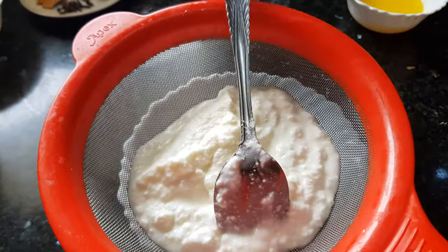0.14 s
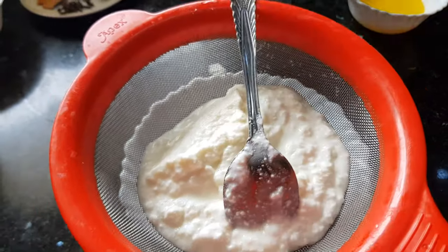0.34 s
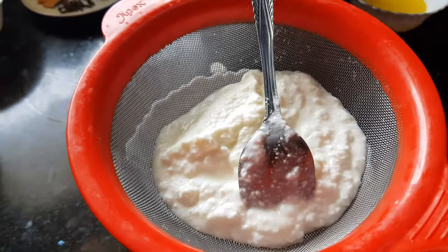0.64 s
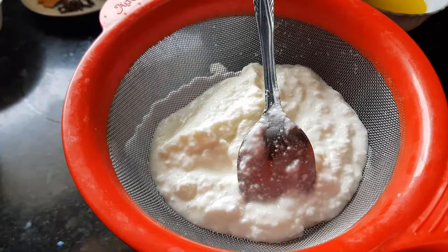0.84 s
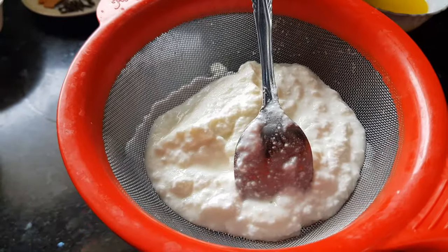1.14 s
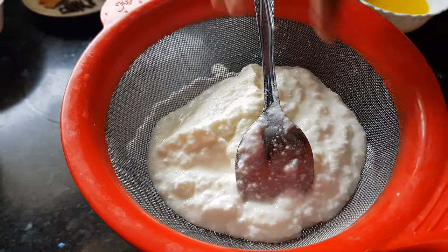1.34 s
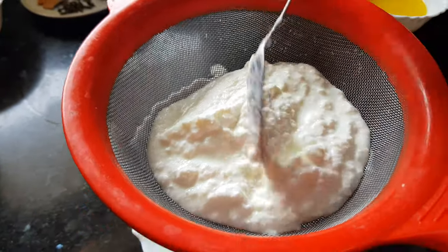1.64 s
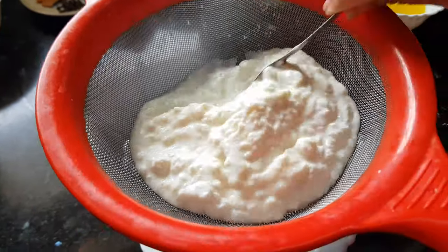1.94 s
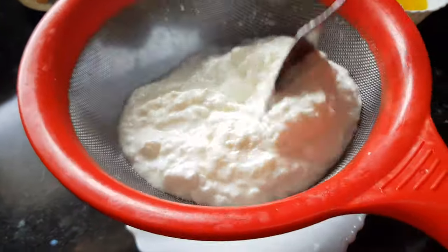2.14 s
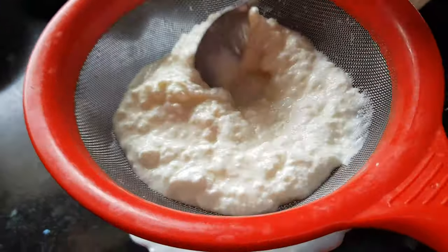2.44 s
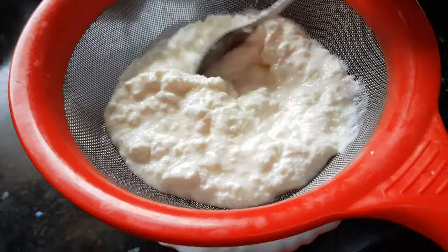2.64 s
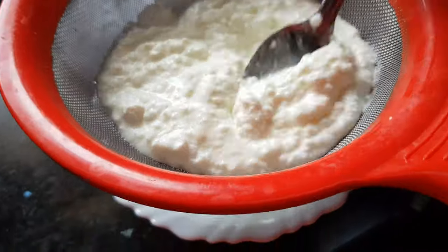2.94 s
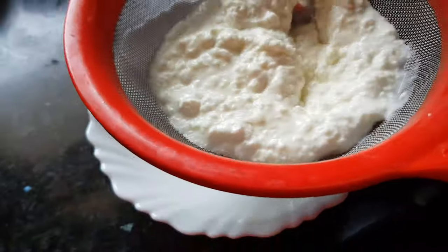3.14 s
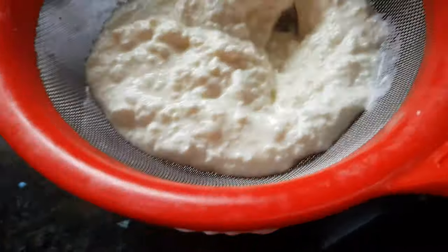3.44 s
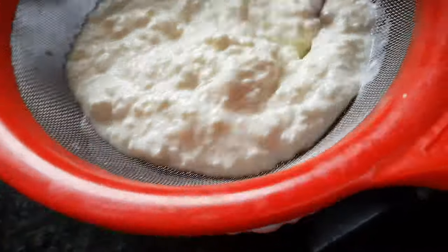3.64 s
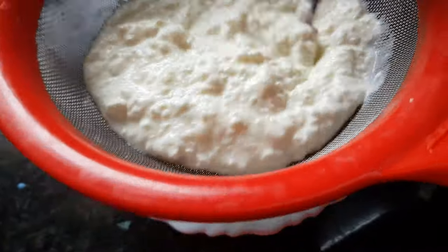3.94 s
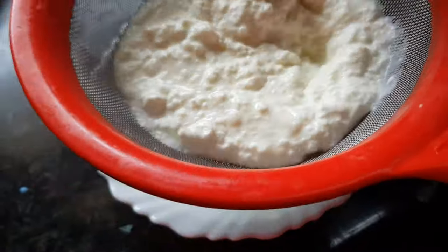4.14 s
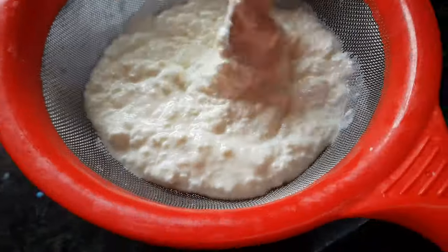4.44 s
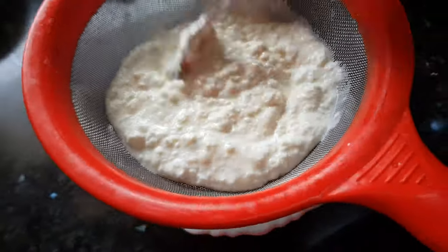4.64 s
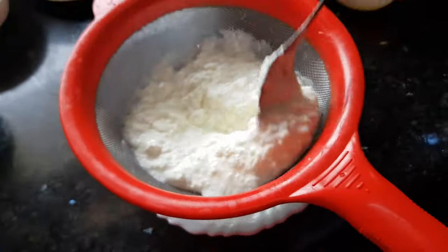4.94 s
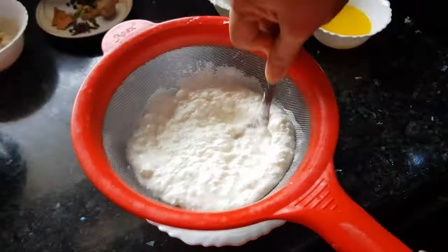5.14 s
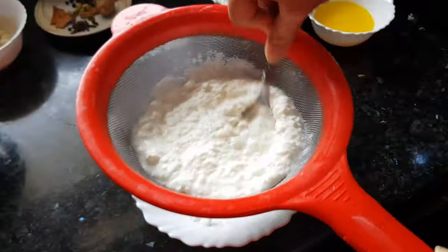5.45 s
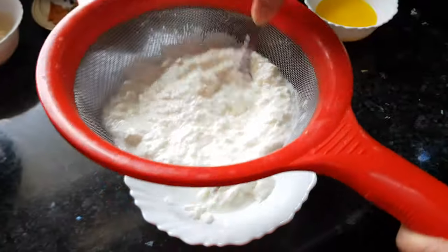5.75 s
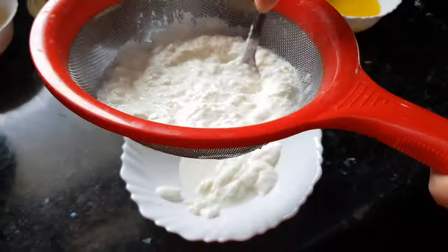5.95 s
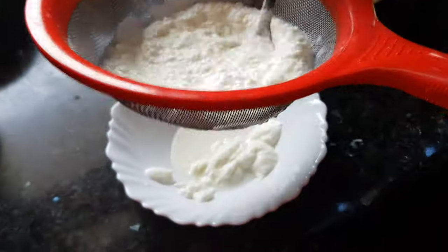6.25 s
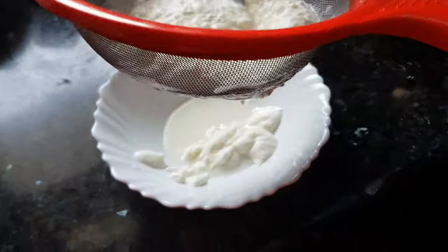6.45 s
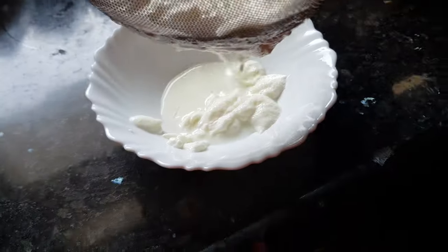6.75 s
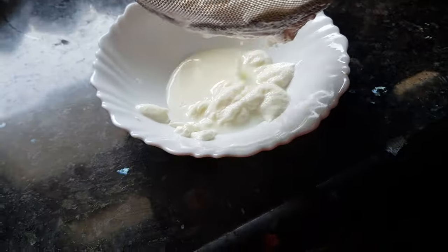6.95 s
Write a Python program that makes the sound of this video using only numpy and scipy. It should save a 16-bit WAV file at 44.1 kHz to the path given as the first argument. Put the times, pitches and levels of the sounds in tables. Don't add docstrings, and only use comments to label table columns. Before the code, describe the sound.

A small kitchen with a faint low appliance hum and an accelerating vehicle outside. A cup clinks faintly, a sharp bright snap follows, then a hollow object is set down with a hard rattling knock. After a pause with light taps, a steel spoon scrapes curd through a wire strainer in short, uneven, gritty strokes, some buzzing or squeaking. Close stereo microphones, spoon slightly left.

```python
import sys
import numpy as np
from scipy import signal
from scipy.fft import rfft, irfft, next_fast_len
from scipy.io import wavfile
from scipy.ndimage import uniform_filter1d, map_coordinates

SR = 44100
rng = np.random.default_rng(int(sys.argv[2]) if len(sys.argv) > 2 else 0)


def store_pcm(level_fs):
    pcm = np.round(np.clip(level_fs, -1, 1) * 32767).astype(np.int16)
    wavfile.write(sys.argv[1], SR, np.atleast_2d(pcm).T)


def nominal_scale(level):
    x = np.asarray(level, float) / 20
    return 10 ** x


N = 312669


def unit(x):
    return x / np.sqrt(np.mean(x ** 2) + 1e-20)


def along(points, hz):
    f, v = np.transpose(points)
    return np.interp(np.log(hz + 1), np.log(f + 1), v)


def held(rows):
    s, *cols = np.transpose(rows)
    return [np.interp(np.arange(N) / SR, s, c) for c in cols]


def curves(tables, silent_db=-120):
    t = np.arange(N) / SR
    out = np.full((len(tables[0][0]) - 1, N), float(silent_db))
    for rows in tables:
        s, *cols = np.transpose(rows)
        inside = (t >= s[0]) & (t <= s[-1])
        out[:, inside] = [np.interp(t[inside], s, c) for c in cols]
    return out


def wobble(rate):
    knots = rng.standard_normal(int(N * rate / SR) + 4)
    return map_coordinates(knots, [np.arange(N) * rate / SR])


def filtered(x, response):
    m = next_fast_len(N + SR // 2)
    return irfft(rfft(x, m) * response(np.fft.rfftfreq(m, 1 / SR)), m)[..., :N]


def resonances(modes):
    def mode(f, k, centre, width, db):
        return (-1) ** k * nominal_scale(db) * 1j * f * width / (centre * centre - f * f + 1j * f * width)
    return lambda f: sum(mode(f, k, *row) for k, row in enumerate(modes))


def add(track, s, sound):
    part = track[round(s * SR):][:len(sound)]
    part += sound[:len(part)]


def burst(t60):
    t = np.arange(SR // 4) / SR
    return nominal_scale(-60 * t / max(t60, .001)) * rng.standard_normal(len(t))


HUM_HZ = (53.3, 69, 244, 401, 425, 505)
# level_db, unsteadiness_db
HUM = [(-41.5, 0.6), (-51, .6), (-62, 2.5), (-61.5, 1), (-65, 5), (-69.5, 3.5)]


def appliance():
    t = np.arange(N) / SR
    out = np.zeros(N)
    for hz, (db, sway_db) in zip(HUM_HZ, HUM):
        level = nominal_scale(db + 3.0 + sway_db * wobble(4.9))
        out += level * np.sin(2 * np.pi * hz * t + 0.8 * sway_db * wobble(4))
    return out


# time_s, shaft_hz
SHAFT = [(0, 19), (.7, 20.6), (1.5, 22), (2.4, 23.6), (2.9, 24.2), (5.1, 26.5), (5.3, 26.7)]
# time_s, order_5_db, order_4_relative_db
VEHICLE = [(0, -53, -6), (.7, -54, -12), (.95, -65, 4), (1.5, -59.5, 11.5), (2.4, -54, 6),
           (2.75, -53.5, -5), (2.95, -56, -4), (4.2, -55, -5), (5.05, -51.5, -16), (5.25, -86, -6)]
ORDERS_HEARD = (4, 5, 7, 8)


def vehicle():
    (shaft_hz,), (engine_db, fourth_db) = held(SHAFT), held(VEHICLE)
    turns = 2 * np.pi * np.cumsum(shaft_hz) / SR
    levels = [engine_db + rel_db for rel_db in (fourth_db, 0, -10.5, -12.5)]
    return sum(nominal_scale(db + 3.5 + 1.24 * wobble(8.4)) * np.sin(order * turns)
               for order, db in zip(ORDERS_HEARD, levels))


# pitch_hz, likeness (-1 to 1)
ALIKE = [(60, 0.64), (240, 1), (950, -0.092), (3770, -0.028), (15000, -0.042)]


def rush(spectrum, patchy_db):
    z = signal.stft(rng.standard_normal((2, N + 512)), nperseg=512)[2]
    field = uniform_filter1d(uniform_filter1d(rng.standard_normal(z.shape[1:]), 6, 0), 12, 1)
    pair = signal.istft(z * nominal_scale(patchy_db * unit(field)), nperseg=512)[1][:, :N]

    def split(hz):
        turn = np.arccos(np.clip(along(ALIKE, hz), -1, 1)) / 2
        return nominal_scale(along(spectrum, hz)) * [np.cos(turn), np.sin(turn)]

    mid, side = filtered(pair, split)
    return unit(np.array([mid + side, mid - side]))


# time_s, hiss_db
AIR = [(0.0, -49), (.35, -52.5), (.83, -51), (1.14, -55.5), (2.4, -55), (3.0, -54), (3.7, -49.5),
       (4.45, -52), (5.15, -51.5), (6.6, -51.5), (7.09, -51)]
# pitch_hz, density_db
RUMBLE = [(24, -33.5), (40, -1), (59, -2), (76, -5.5), (157, -20.5), (237, -12.5), (289, -17), (343, -22),
          (407, -12.5), (462, -16.5), (651, -26.5), (890, -32.5), (1200, -53), (1560, -54), (2640, -120)]
# pitch_hz, density_db
HISS = [(470, -8.5), (800, -6), (1330, -11), (1510, -8), (1890, -13.5), (2500, -12.5), (4200, -12.5),
        (4650, -13), (5480, -12), (8330, -19.5), (9330, -19), (11400, -14), (15300, -20.5), (16500, -42)]


def air():
    hiss_db, = held(AIR)
    rumble_db = hiss_db + 5 - 0.4 * wobble(1.357)
    return nominal_scale(rumble_db) * rush(RUMBLE, patchy_db=2.5) + nominal_scale(hiss_db) * rush(HISS, patchy_db=0.64)


# start_s, peak_db, pitch_hz, t60_s
CLINKS = [
    (0.0144, -44, 3564, 0.2),
    (0.0554, -42, 3540, 0.1),
    (0.0817, -39, 3520, 0.07),
]


def cup():
    out, t = np.zeros(N), np.arange(SR // 4) / SR
    for s, db, hz, t60 in CLINKS:
        ring = np.sin(2 * np.pi * hz * t) + 0.18 * np.sin(2 * np.pi * hz * 1.77 * t)
        add(out, s, nominal_scale(db + 5.5 - 60 * t / t60) * (1 - np.exp(-t / 0.00062)) * ring)
    return out * (0.87 + 0.35 * wobble(258))


# start_s, peak_db, t60_s
SNAPS = [
    (0.074, -32, 0.017),
    (0.0812, -22, 0.035),
    (0.1445, -6.5, 0.031),
    (0.1673, -15, 0.029),
]
# pitch_hz, density_db
SNAP_COLOUR = [(350, -58), (600, -25), (1290, -10.5), (3040, -10.5), (3780, 0.5), (4500, -12), (5950, -4),
               (6640, -12.5), (9110, -6.5), (16000, -5.5)]


def snaps():
    out = np.zeros(N)
    for s, db, t60 in SNAPS:
        add(out, s, nominal_scale(db + 5) * burst(0.0081))
        add(out, s, nominal_scale(db - 8.0) * burst(t60))
    return filtered(out, lambda hz: nominal_scale(along(SNAP_COLOUR, hz)))


def whine(rows, width_hz, steady):
    out = np.zeros(N)
    for s, length, from_hz, to_hz, db in rows:
        u = np.linspace(0, 1, round(length * SR))
        phase = 2 * np.pi * np.cumsum(from_hz + (to_hz - from_hz) * u) / SR
        add(out, s, nominal_scale(db + 10) * np.sin(np.pi * u ** 0.46) * np.sin(phase))
    return out * (steady + wobble(width_hz))


# start_s, length_s, from_hz, to_hz, level_db
FAR = [(.33, 0.1, 1557, 1570, -68), (.55, 0.071, 2210, 2160, -63.5), (.655, 0.11, 850, 845, -58.5),
       (1.85, 0.15, 735, 843, -66.5), (3.05, 0.12, 900, 983, -66.5), (4.42, 0.079, 906, 940, -61)]


def creaks():
    return whine(FAR, width_hz=260, steady=.3)


# start_s, peak_db, crack_relative_db
KNOCK = [
    (.7772, -6, -30),
    (.7792, -17.5, -12),
    (.7885, -10.5, -28),
    (.7945, -20, -37),
    (.798, -13.5, -30),
    (.812, -42, -34),
]
# pitch_hz, level_db, t60_s
KNOCK_MODES = [(201.8, -21, 0.214), (253, -9, 0.65), (361.5, 2, 0.18), (516.7, 4.5, 0.24), (696, 11, 0.11),
               (798, 3.5, 0.17), (906, -6, 0.268), (1176, 4, 0.36), (1300, 4, 0.42)]
# pitch_hz, width_hz, level_db
HOLLOW = [(201.3, 130, -4.5), (1410, 570, 2.5), (2860, 640, 0.45), (3320, 550, -1), (4950, 1100, -11),
          (5940, 490, -12)]


def knocking():
    blows, out, t = np.zeros(N), np.zeros(N), np.arange(SR // 2) / SR
    for s, db, crack_db in KNOCK:
        add(blows, s, nominal_scale(db + 22.5) * np.hanning(5))
        add(blows, s, nominal_scale(db + 10.0) * burst(0.026))
        add(out, s, nominal_scale(db + crack_db) * burst(0.011))
        ring = sum(nominal_scale(level + rng.normal(0, 1) - 60 * t / t60) * np.sin(2 * np.pi * hz * t)
                   for hz, level, t60 in KNOCK_MODES)
        add(out, s, nominal_scale(db - 30.5) * ring)
    return out + filtered(blows, lambda hz: resonances(HOLLOW)(hz) ** 2)


# start_s, peak_db, pitch_hz, width_hz
TICKS = [(1.015, -38, 6150, 1190), (2.555, -41, 5870, 1200), (5.787, -40, 3000, 900),
         (3.508, -30.5, 3030, 1300), (3.88, -33.5, 1420, 1487), (4.36, -36.5, 4870, 1500)]


def ticks():
    out, size = np.zeros(N), SR // 4
    f = np.arange(size // 2 + 1) * SR / size
    for s, db, hz, width_hz in TICKS:
        tick = irfft(rfft(burst(0.013)) * resonances([(hz, width_hz, 0)])(f) ** 2, size)
        add(out, s, nominal_scale(db + 14) * tick)
    return out


# start_s, peak_db, frame_relative_db
TOUCHES = [(1.251, -20, -17), (1.366, -15.5, -15.5), (2.1832, -8, -13), (2.593, -21, -5),
           (3.1367, -18, -10), (3.275, -36, -17), (3.783, -28, -20), (3.8398, -20.5, -5), (4.077, -35, -12),
           (4.2016, -20, -6), (4.4458, -20, -18), (4.6244, -3, -21), (4.9093, -29, -14), (4.994, -12.5, -1),
           (5.2264, -34, -14), (5.5094, -29, -16), (5.7533, -35, 5), (5.8003, -33.5, 11),
           (6.0641, -11, -17), (6.613, -29, -7)]
# pitch_hz, density_db
MESH = [(1470, -9), (2500, -67), (2710, -13), (3090, -6.5), (4140, 0), (4970, -5.5), (5380, -1),
        (7920, -8.5), (12300, -0.5), (15000, -4), (15700, -2), (16100, -45), (16500, -65)]


def touches():
    spit, knock = np.zeros(N), np.zeros(N)
    for s, db, frame_db in TOUCHES:
        add(spit, s, nominal_scale(db - 10.5) * burst(0.018))
        add(knock, s, nominal_scale(db + frame_db) * burst(0.0052))
    spit = filtered(spit, lambda hz: nominal_scale(along(MESH, hz) - 4.5))
    return spit + filtered(knock, resonances([(1800, 4800, 0)]))


USUAL_DB = -32.5
# start_s, rise_s, lift_off_s, rasp_db, frame_relative_db
STROKES = [(2.183, 0.095, .085, -36, -9.5), (2.59, 0.0029, 0.022, -39, -7),
           (3.134, .003, 0.0315, -56, -15.5), (3.271, 0.004, 0.085, -38.5, -9.5),
           (3.778, 0.0055, 0.06, -44, -9), (4.076, 0.048, .07, -48.5, -7.5),
           (4.625, 0.078, 0.12, -28, -9.5), (4.992, 0.082, 0.1, -33.5, -6.5),
           (5.227, 0.07, 0.15, -33, -7.5), (5.508, 0.1, .13, -37, -6), (5.801, 0.021, 0.075, -49, -3),
           (6.06, 0.058, 0.16, -37, -5.5), (6.29, .004, 0.03, -49.5, -16), (6.31, 0.13, 0.092, -43, -4.5),
           (6.61, 0.073, 0.19, -44, -2.5)]
# start_s, rise_s, lift_off_s, rasp_db, frame_relative_db
SWEEPS = [(2.63, 0.036, 0.067, -32, -13), (2.96, 0.038, 0.07, -62, -2), (3.366, 0.038, 0.017, -38.5, -5.5),
          (3.546, 0.058, 0.072, -30, -4.5), (3.685, 0.017, .045, -43.5, -8),
          (3.877, 0.049, 0.083, -35.5, -8.5), (4.197, 0.057, 0.12, -33, -4.5),
          (5.86, 0.035, 0.071, -38, -8), (6.385, 0.048, 0.078, -38.5, -7.5),
          (6.675, 0.047, 0.058, -39.5, -10), (6.864, 0.13, 0.13, -38, -6.5)]


def pressure():
    rasp_db, frame_db, t = np.full(N, -120.), np.zeros(N), np.arange(N) / SR
    strokes = []
    for row in STROKES:
        landing_db = -41 + 0.22 * (row[3] - USUAL_DB)
        strokes.append((*row, min(row[3], landing_db), 1.9))
    for row in SWEEPS:
        strokes.append((*row, row[3] - 20.5, 0.75))
    for s, rise, lift, db, rel_db, entry_db, curve in strokes:
        span = slice(round(s * SR), round((s + rise + 2 * lift) * SR))
        since = t[span] - s
        swell = np.sin(np.pi / 2 * np.clip(since / rise, 0, 1)) ** curve
        lift_db = 32.5 * np.clip((since - rise) / lift, 0, None) ** 1.85
        level_db = entry_db + (db - entry_db) * swell - lift_db
        frame_db[span] = np.where(level_db > rasp_db[span], rel_db, frame_db[span])
        rasp_db[span] = np.maximum(level_db, rasp_db[span])
    return rasp_db, frame_db


# start_s, length_s, from_hz, to_hz, buzz_db
BUZZ = [(2.225, 0.064, 247, 435, -50.5), (4.237, 0.05, 654, 502, -55), (4.65, 0.0535, 416.7, 579, -44.5),
        (4.706, 0.047, 640.6, 571, -42), (5.02, 0.066, 400.4, 727, -45.5), (5.312, 0.033, 758, 735, -57.5)]


def crossing():
    passes = []
    for s, length, from_hz, to_hz, top_db in BUZZ:
        edge_db = top_db - 7
        passes.append([(s, from_hz, edge_db),
                       (s + length / 3, (2 * from_hz + to_hz) / 3, top_db),
                       (s + 2 * length / 3, (from_hz + 2 * to_hz) / 3, top_db),
                       (s + length, to_hz, edge_db)])
    hz, db = curves(passes)
    phase = 2 * np.pi * np.cumsum(np.maximum(hz, 0) * (1 + .025 * wobble(150))) / SR
    unsteady_db = 1.5 * wobble(90)
    return phase, uniform_filter1d(nominal_scale(db + 10.5 + unsteady_db), size=600)


def plucking(phase, strength):
    plucks = (rng.random(N) < 5000 / SR) * nominal_scale(3.2 * rng.standard_normal(N))
    grit = (unit(plucks) + 0.93) * nominal_scale(0.215 * wobble(300) + 1.15 * wobble(60))
    grit = grit * (1 + np.clip(strength / nominal_scale(-34), 0, .9) * np.cos(phase))
    return grit * rng.standard_normal((3, N))


# pitch_hz, width_hz, level_db
FRAME = [(1330, 83, -3), (1900, 95, 6), (2500, 980, 3)]
# time_s, nearness to the ring (0 to 1)
SPOT = [(2.2, 0.8), (2.65, 1), (3.29, .05), (3.4, 0.4), (3.62, 0.5), (3.93, 1), (4.27, 0.62), (4.7, 0.46),
        (5.05, 0.26), (5.3, 0.27), (5.6, 0.35), (5.9, 0.44), (6.12, 0.55), (6.4, 0.32), (6.7, 0.13),
        (7.0, 0)]


def scraping(phase, strength):
    rasp_db, frame_db = pressure()
    near = np.clip(held(SPOT)[0], 0, 1)
    contact_hz = 2500 - 860 * near + 11 * (rasp_db - USUAL_DB) + 123 * wobble(12)
    shake = plucking(phase, strength)
    hz, t, z = signal.stft(shake, SR, nperseg=512)

    patches = uniform_filter1d(uniform_filter1d(rng.standard_normal(z.shape[1:]), 5, 0), 9, 1)
    colour = nominal_scale(along(MESH, hz)[:, None] + 3.0 * unit(patches))
    rasp = unit(signal.istft(z * colour, SR, nperseg=512)[1][:, :N])

    ring = unit(filtered(shake, lambda f: resonances(FRAME)(f) * (1j * f / (900 + 1j * f)) ** 2))

    seconds = np.arange(N) / SR
    centre = np.interp(t, seconds, np.maximum(contact_hz, 900))
    width = 300 + 352 * np.interp(t, seconds, 1 - near) ** 2
    contact = z / (1 + ((hz[:, None] - centre) / width) ** 2)
    contact = unit(signal.istft(contact, SR, nperseg=512)[1][:, :N])

    press = uniform_filter1d(nominal_scale(rasp_db), size=64)
    body = uniform_filter1d(nominal_scale(rasp_db + frame_db), size=64)
    return press * rasp * nominal_scale(2.0) + body * unit(0.83 * near * ring + 0.69 * contact) * nominal_scale(1.5)


def buzzing(phase, strength):
    return strength * (np.sin(phase) + nominal_scale(-24.5) * np.sin(2 * phase) + nominal_scale(-28) * np.sin(3 * phase))


# start_s, length_s, from_hz, to_hz, level_db
SINGING = [(2.23, 0.11, 1927, 1900, -49.5), (2.68, 0.023, 1310, 1330, -53),
           (3.38, 0.042, 1560, 1310, -49.5), (3.57, 0.058, 2500, 1680, -37), (3.595, 0.063, 1750, 940, -39),
           (4.155, 0.018, 1490, 1490, -51), (4.24, 0.089, 1495, 1043, -47), (4.688, 0.052, 1330, 1357, -38),
           (4.69, 0.0336, 1950, 2049, -39.5), (4.72, 0.05, 1440, 1460, -45.5),
           (4.735, 0.036, 1900, 1990, -39), (5.0, 0.043, 1870, 1814, -47), (5.0, 0.088, 925, 1060, -50.5),
           (5.06, 0.024, 2800, 3120, -49), (5.27, 0.098, 1233, 1317, -44), (5.28, 0.055, 2912, 2500, -36.5),
           (5.51, 0.22, 1247, 1038, -51.5), (6.07, 0.1, 1290, 1221, -52), (6.35, 0.14, 1525, 1476, -57),
           (5.85, 0.12, 1275, 1240, -53), (6.34, 0.17, 2360, 2284, -51), (6.61, 0.18, 2330, 2380, -59),
           (6.9, 0.133, 2220, 2470, -51)]


def singing():
    return whine(SINGING, width_hz=380, steady=0.6)


# start_s, peak_db, pitch_hz
PLOP = [
    (6.708, -27.5, 224),
]


def plop():
    out, t = np.zeros(N), np.arange(SR // 4) / SR
    for s, db, hz in PLOP:
        add(out, s, nominal_scale(db + 13 - 60 * t / 0.012) * (1 - np.exp(-t / 0.0012)) * np.sin(2 * np.pi * hz * t))
    return out


# pitch_hz, t60_s
KITCHEN = [(200, 0.51), (1500, 0.4), (5000, 0.41), (12000, 0.34)]


def kitchen(x):
    out, step = np.zeros((2, N + SR)), SR // 4
    for start in range(0, N, step):
        part = x[start:start + step]
        if np.abs(part).max() > 1e-5:
            hz, t, z = signal.stft(rng.standard_normal((2, SR // 3)), SR, nperseg=256)
            decay = nominal_scale(-60 * t / along(KITCHEN, hz)[:, None])
            tail = signal.istft(z * decay, SR, nperseg=256)[1]
            answer = signal.fftconvolve(part[None], tail / np.linalg.norm(tail[0]), axes=1)
            out[:, start + SR // 200:][:, :answer.shape[1]] += answer
    return out[:, :N]


def worktop(pair):
    span_s, total_db = .006, -1.5
    shape = (2, round(span_s * SR))
    echoes = rng.standard_normal(shape) * (rng.random(shape) < .06)
    echoes = np.diff(uniform_filter1d(echoes, size=3), n=1, prepend=0) + echoes / 2
    echoes = nominal_scale(total_db) * echoes / np.linalg.norm(echoes, axis=1, keepdims=True)
    return (pair + signal.oaconvolve(pair, echoes, axes=1)[:, :N]) / np.hypot(1, nominal_scale(total_db))


def placed(x, lead_s, wet_db, left_db, apart=0):
    sides = np.array([[1], [-1]])
    direct = filtered(x, lambda hz: np.exp(1j * np.pi * hz * lead_s * sides))
    return nominal_scale(left_db / 2 * sides) * (worktop(direct) + apart) + nominal_scale(wet_db) * kitchen(x)


def scene():
    background = appliance() + vehicle() + air()
    shelf = placed(cup() + snaps() + ticks() + plop(), lead_s=0.0001, wet_db=-9.0, left_db=2)
    far = placed(creaks(), lead_s=0, wet_db=0.0, left_db=-4.0)
    knock = placed(knocking(), lead_s=-.00004, wet_db=-9.5, left_db=-.5)
    wires = crossing()
    common, *alone = scraping(*wires)
    spoon = common + buzzing(*wires) + touches() + singing()
    apart = nominal_scale(3.0) * filtered(np.array(alone), lambda hz: 1j * hz / (2000 + 1j * hz))
    strainer = nominal_scale(-4) * placed(spoon, lead_s=.0001, wet_db=-7.0, left_db=1.05, apart=apart)
    return strainer + shelf + knock + far + background


def low_pass(x):
    return signal.sosfilt(signal.butter(12, 16970, fs=SR, output="sos"), x)


# pitch_hz, left_over_right_db
LEFT_LOUDER = [(60, 2), (180, 1.5), (550, -0.5), (1650, 2.5), (4970, 4), (15000, 3.5)]


def record(dry):
    sides = np.array([[1], [-1]])
    x = filtered(dry, lambda hz: (1j * hz / (30 + 1j * hz)) ** 4 * nominal_scale(along(LEFT_LOUDER, hz) / 2 * sides))
    x = x / (1 + np.abs(x / 1.1) ** 4) ** (1 / 4)
    x = filtered(x, lambda hz: 1 / (1 + (hz / 15850) ** 80))
    return low_pass(x)


dry = scene()
out = record(dry)
store_pcm(out)
```